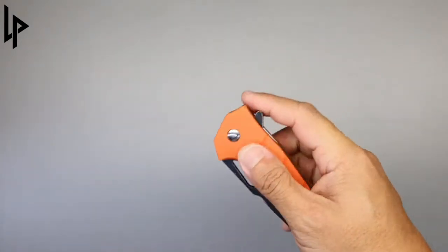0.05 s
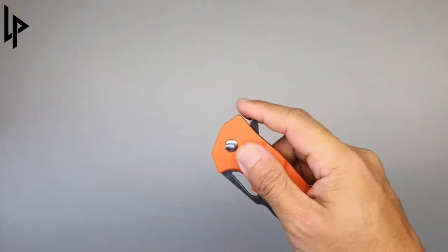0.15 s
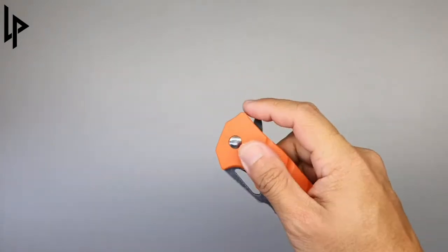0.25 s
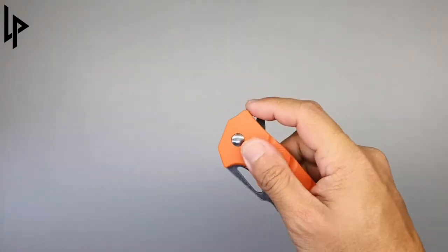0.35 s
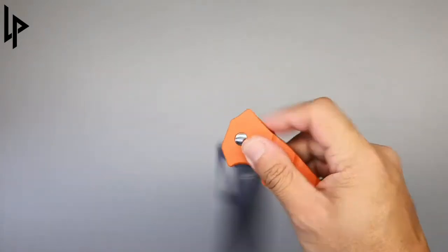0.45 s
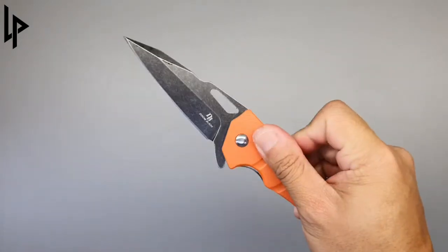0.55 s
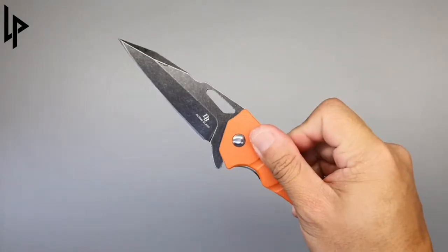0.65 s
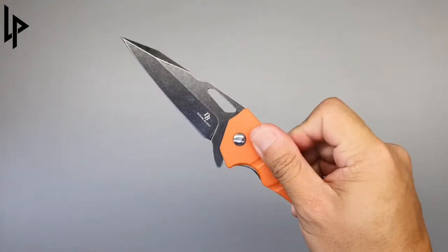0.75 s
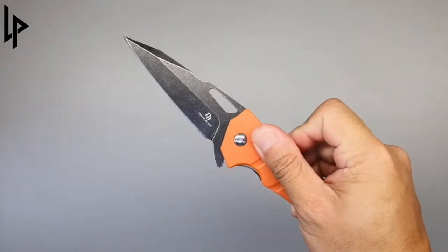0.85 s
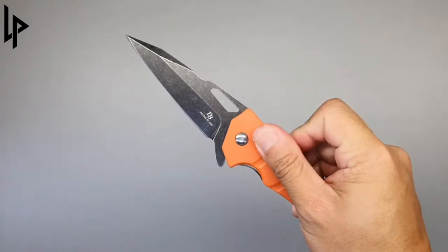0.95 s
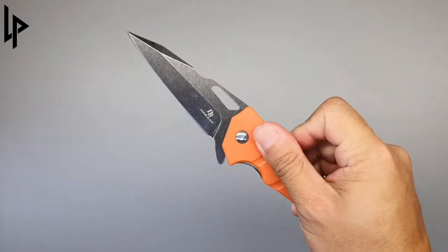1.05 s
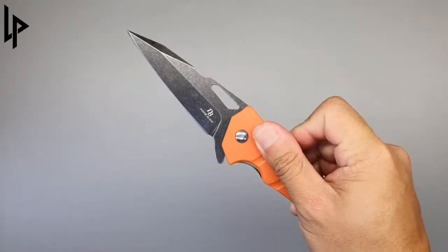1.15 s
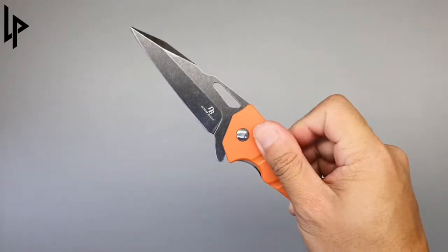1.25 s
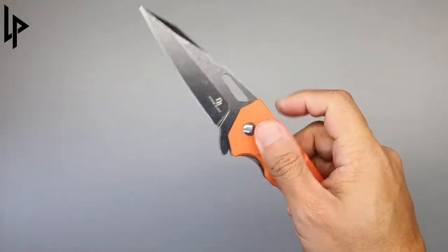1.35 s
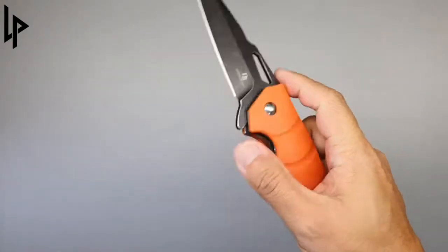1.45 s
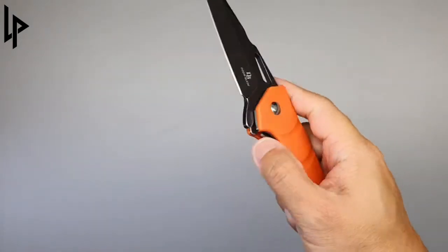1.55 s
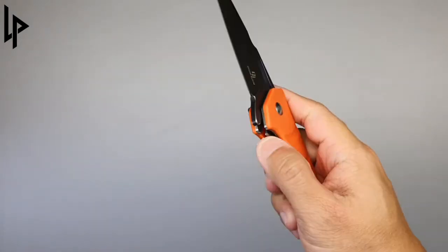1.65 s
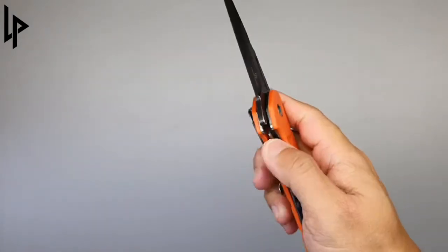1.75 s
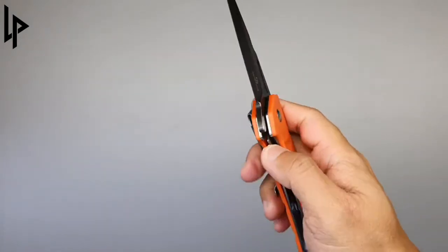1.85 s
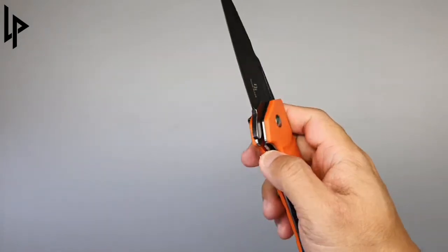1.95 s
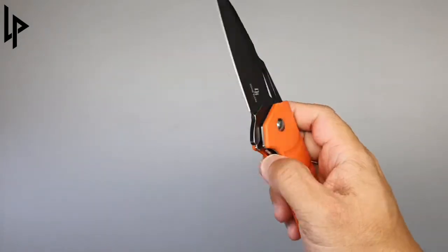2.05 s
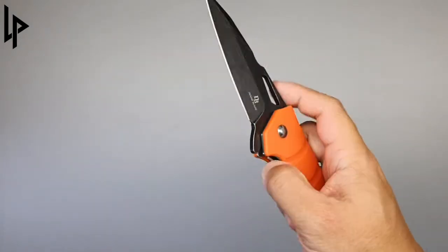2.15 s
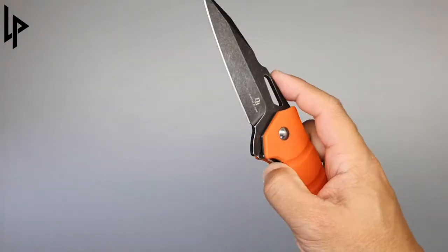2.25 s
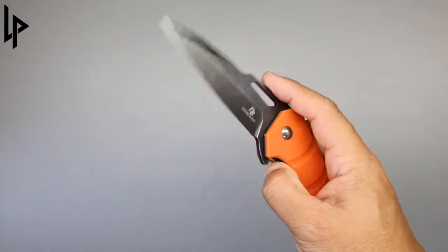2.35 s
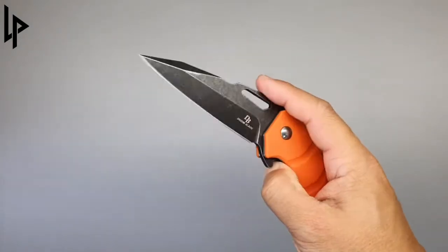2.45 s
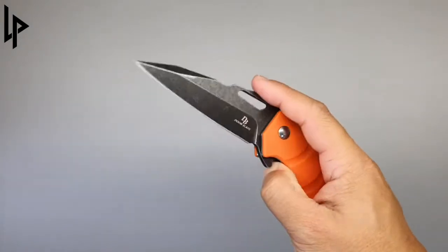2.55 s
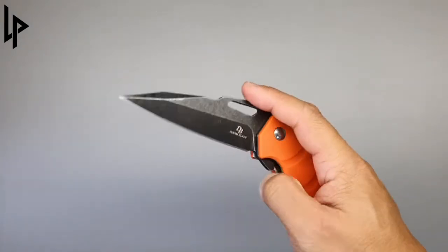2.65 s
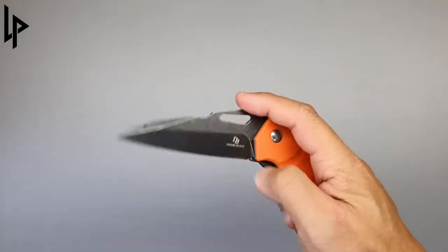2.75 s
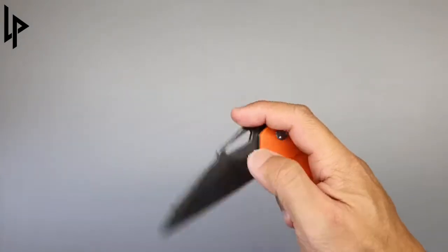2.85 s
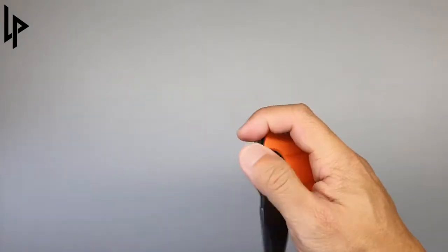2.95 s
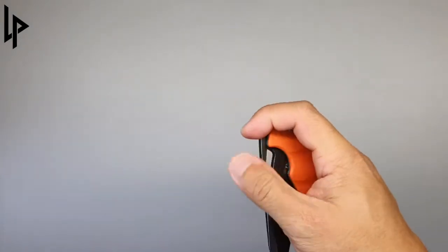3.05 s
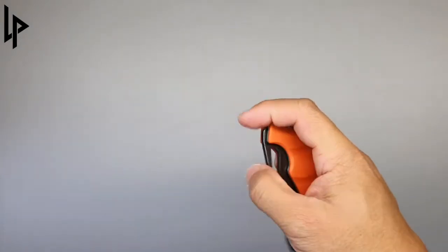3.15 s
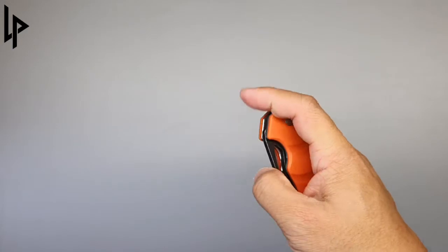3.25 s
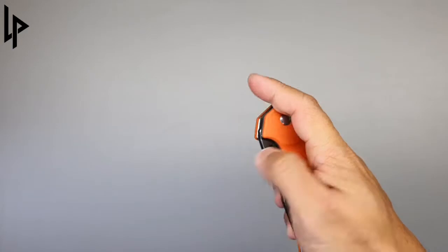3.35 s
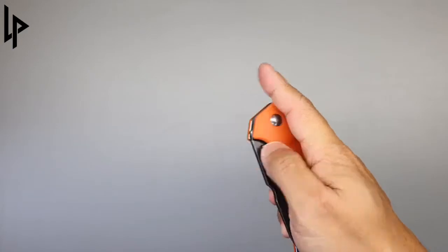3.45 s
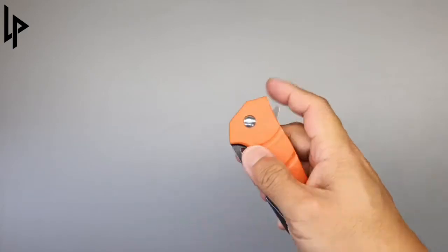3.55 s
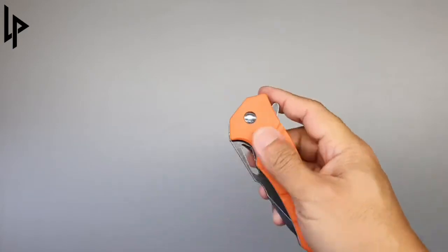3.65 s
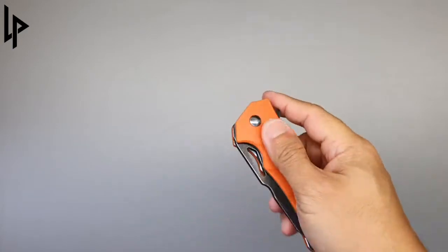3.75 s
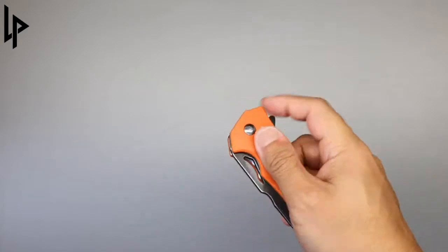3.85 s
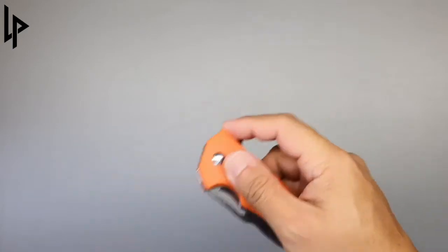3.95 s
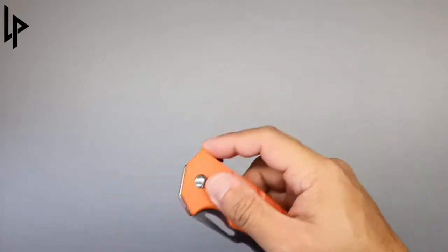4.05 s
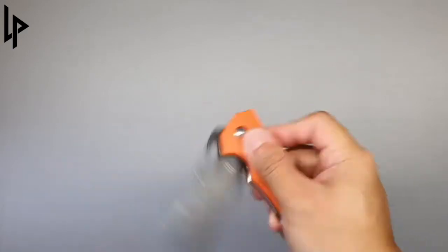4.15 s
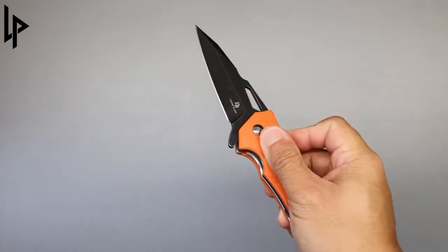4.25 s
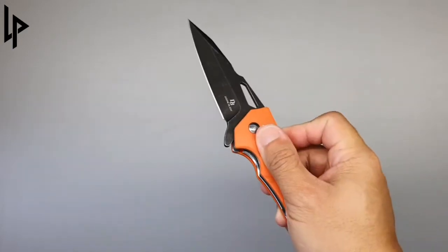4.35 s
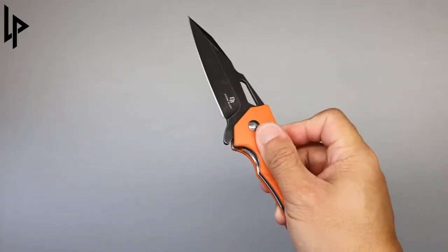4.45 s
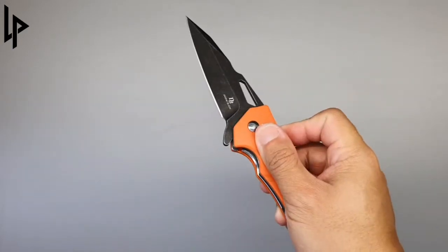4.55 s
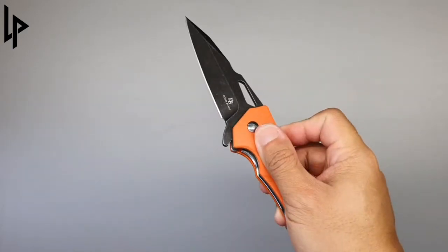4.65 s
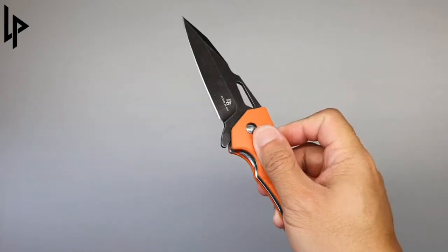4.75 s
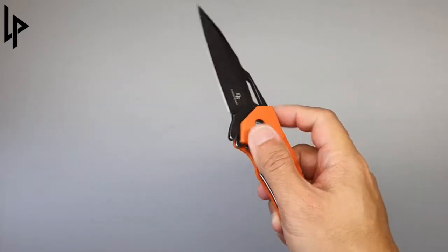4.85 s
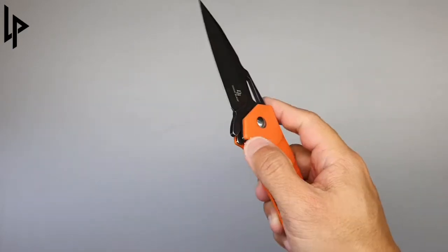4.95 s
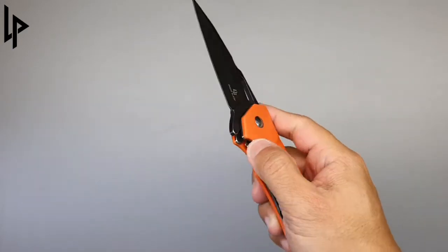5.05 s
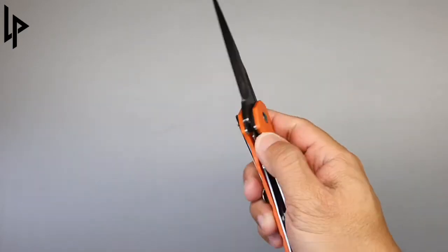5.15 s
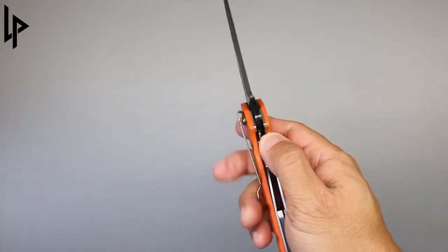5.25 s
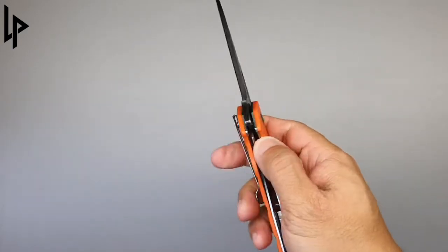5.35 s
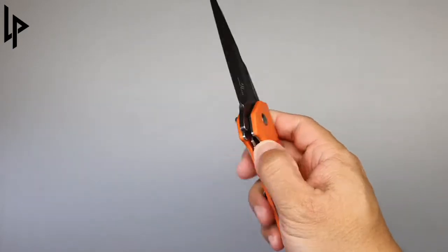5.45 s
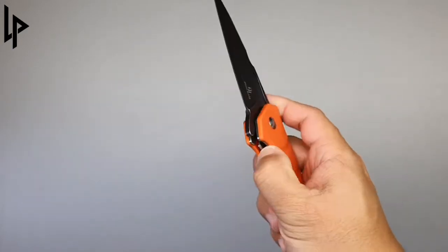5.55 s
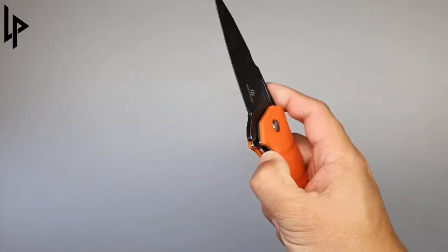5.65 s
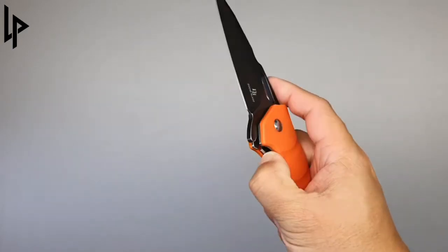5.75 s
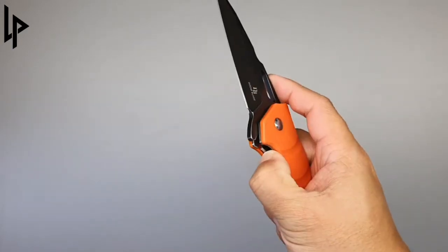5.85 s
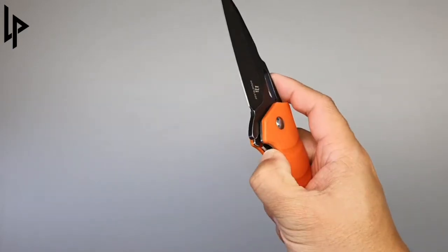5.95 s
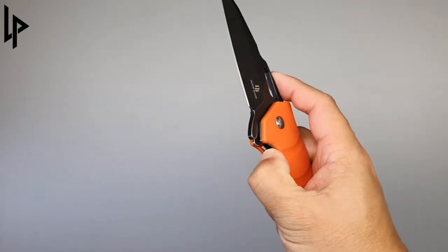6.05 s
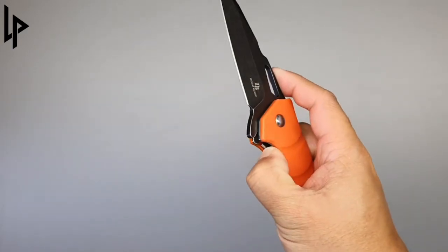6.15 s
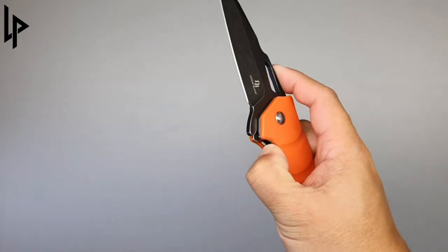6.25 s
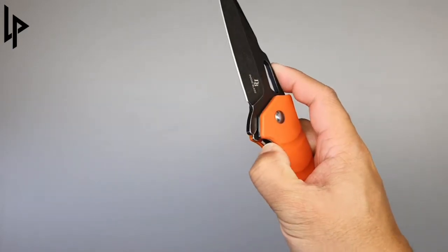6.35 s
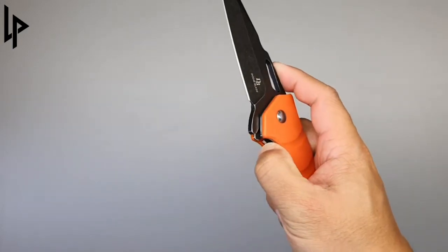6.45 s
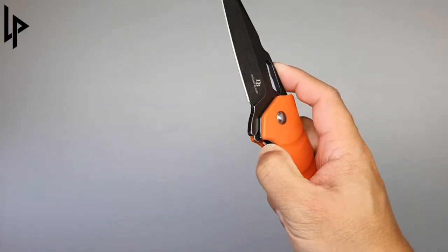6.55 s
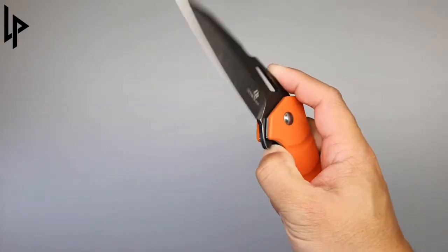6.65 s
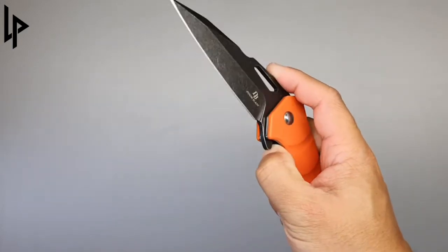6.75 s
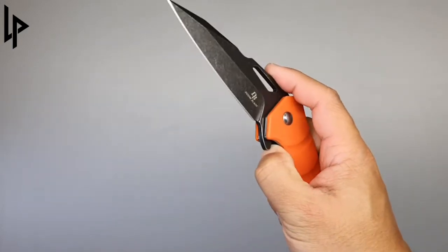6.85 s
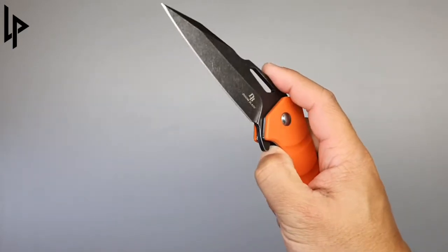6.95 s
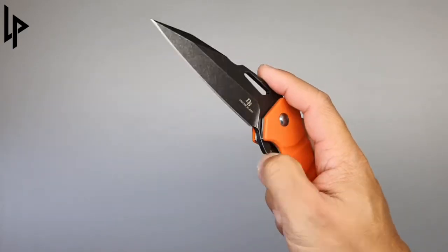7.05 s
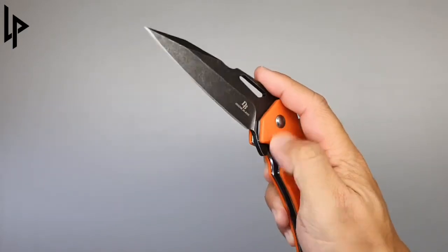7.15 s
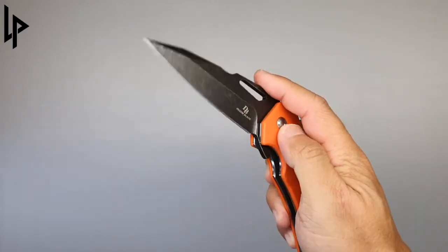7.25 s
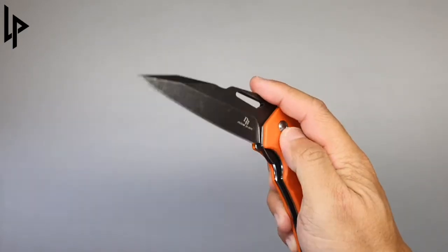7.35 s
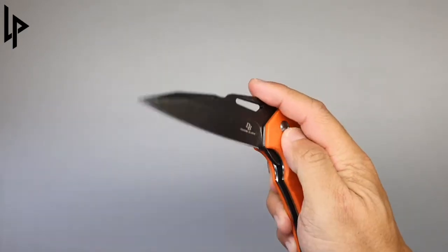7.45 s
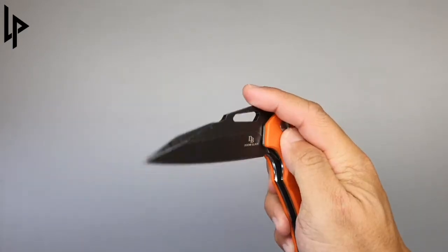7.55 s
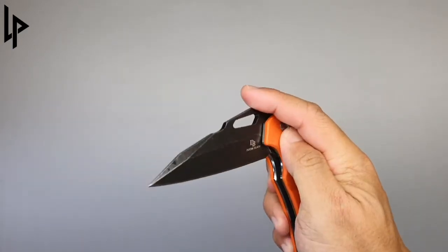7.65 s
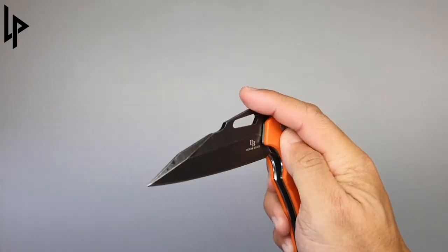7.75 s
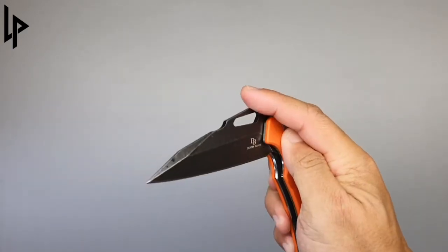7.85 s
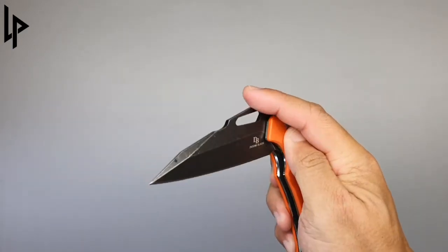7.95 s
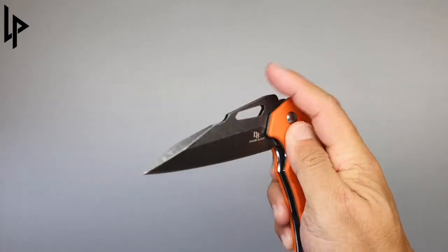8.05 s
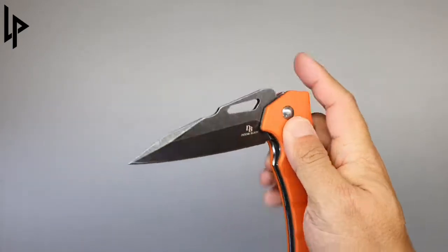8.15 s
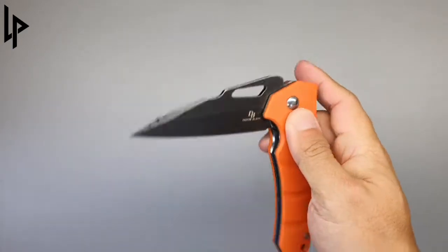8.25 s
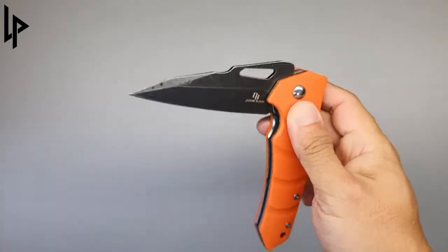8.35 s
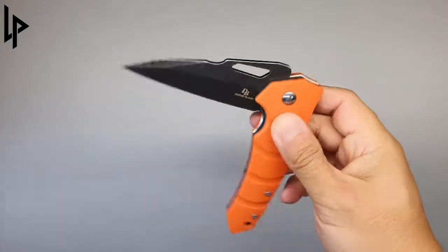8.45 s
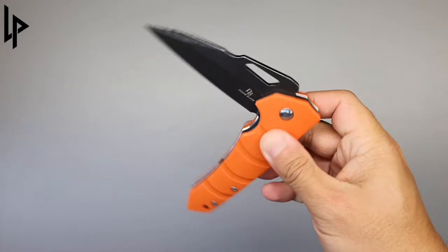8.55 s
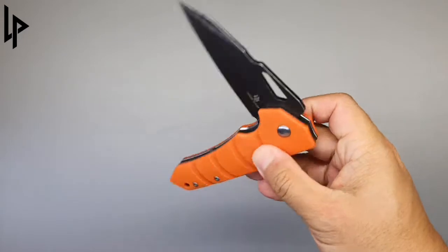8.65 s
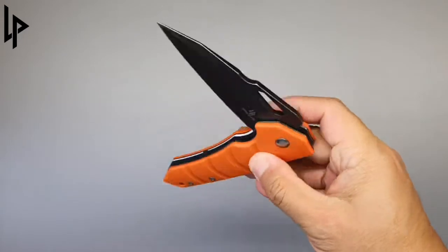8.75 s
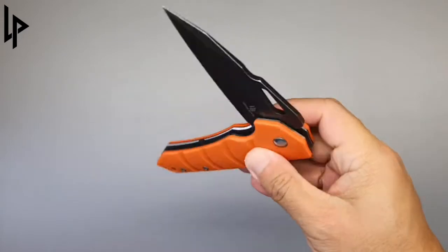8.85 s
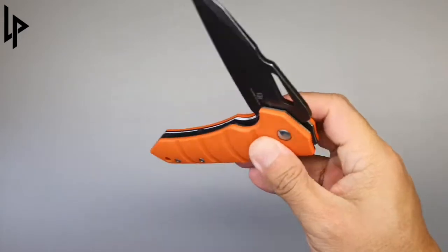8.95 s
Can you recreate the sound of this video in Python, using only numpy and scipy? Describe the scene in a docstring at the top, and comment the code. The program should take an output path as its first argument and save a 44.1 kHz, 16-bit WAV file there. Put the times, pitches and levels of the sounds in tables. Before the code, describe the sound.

A quiet small room with faint low ventilation rumble, barely audible hums and soft hiss, heard in stereo from very close. Light skin rubbing opens it. At about 0.42-0.5 s a folding knife flicks open: a quick grinding rattle of ticks builds into a loud, bright steel clack with a very short ring and room tail. Faint finger rubs follow from 1.3 s. Around 2.15-2.23 s the thumb gives tiny wavering squeaks, and at 2.3 s the lock releases with a crisp click. A barely audible tick at 2.8 s precedes a moderate closing knock at 3.16 s. Airy handle rubs come near 3.6 s, then small ticks and a second loud double snap at 4.14 s. Subtle rubbing and a faint squeak at 5.65 s lead to a softer cluster of unlocking clicks at 6.6 s. After that only slight skin rubs remain over room tone until 9 s.

```python
"""A folding knife is flicked open and folded shut in one hand, close to a phone in a small quiet room.
Its steel parts knock: bursts of tiny contacts ring fading tones of blade, lock bar and handle.
Grinding steel murmurs in the swings, the thumb squeaks as wavering tones, and skin rubs the textured
handle as uneven noise through resonances. The room adds a short noise tail to these near sounds,
over a faint ventilation rumble, hums and hiss."""
import sys
import numpy as np
from scipy import signal
from scipy.fft import rfft, irfft, next_fast_len
from scipy.io import wavfile
from scipy.ndimage import uniform_filter1d, map_coordinates

SR = 44100
rng = np.random.default_rng(int(sys.argv[2]) if len(sys.argv) > 2 else 0)


def to_wav(s):
    """Save 16-bit WAV."""
    ch = np.atleast_2d(s).T  # columns
    pcm = np.round(np.clip(ch, -1, 1) * 32767)  # PCM
    wavfile.write(sys.argv[1], SR, pcm.astype(np.int16))


N = 397341  # length in samples


def undb(db):
    """Turn decibels into a plain gain."""
    return 10 ** (np.asarray(db) / 20)


def unit(x):
    """Scale to rms 1."""
    return x / np.sqrt(np.mean(x ** 2))


def on_log(hz, table):
    """Read a (pitch_hz, value) table on a log-frequency axis."""
    table_hz, values = np.transpose(table)[:2]
    return np.interp(np.log(np.maximum(hz, 1)), np.log(table_hz), values)


def band(x, hz, width_hz):
    """Two-pole resonance, gain 1 at the centre."""
    return signal.lfilter(*signal.iirpeak(hz, hz / width_hz, fs=SR), x)


def walk(rate_hz):
    """A smooth random wander of rms 1: steps at this rate, averaged twice."""
    step = int(SR / rate_hz)
    levels = np.repeat(rng.standard_normal(N // step + 1), step)
    smooth = uniform_filter1d(uniform_filter1d(levels, step), step)
    return unit(smooth[:N])


def gesture(start_s, length_s, attack_s, release_s):
    """Swells up to the start, holds, then dies away; both flanks are bell-shaped."""
    t = np.arange(N) / SR - start_s
    before = np.minimum(t, 0) / attack_s
    after = np.maximum(t - length_s, 0) / release_s
    return np.exp(-4 * (before ** 2 + after ** 2))


# Tone colour of the room's background noise: pitch_hz, relative level_db (per Hz)
AIR_COLOUR = [(12, -40.5), (20, -19.5), (48, -1.5), (107, -5), (138, -7.5), (234, -18), (262, -21.5),
              (328, -12.5), (485, -22), (738, -21), (923, -26), (1860, -39.5), (2080, -42), (7730, -51),
              (16000, -58.5)]
# How much the two microphone ports differ in that noise: pitch_hz, side_minus_mid_db
AIR_WIDTH = [(60, -11), (110, -15.5), (200, -8.5), (380, -3), (700, -1.5), (1290, 2.5), (2380, 1),
             (4400, -2), (8120, 1), (15000, -1.5)]
# Slow rise and fall of the rumble: time_s, level_db
RUMBLE_LEVELS = [(0.0, -62), (0.93, -68.5), (3.26, -65), (4.47, -70), (5.8, -62.5), (6.52, -67),
                 (9.01, -63.5)]
# Faint hums, each wandering around these values: pitch_hz, level_db
HUMS = [(59.2, -73.5), (145.3, -73.5), (1100, -95), (1803, -99)]
HISS_DB = -71.5  # the level drifts around this


def air():
    """Room tone: a wandering rumble, nearly alike on both ports, four hums and a nearly steady hiss."""
    t = np.arange(N) / SR
    size = next_fast_len(N)
    hz = np.arange(size // 2 + 1) * SR / size
    mid, side = rfft(rng.standard_normal((2, size))) * undb(on_log(hz, AIR_COLOUR))
    side = side * undb(on_log(hz, AIR_WIDTH))
    pair = np.array([mid + side, mid - side])
    # split around 200 Hz into rumble and hiss
    low = 1 / (1 + (hz / 200) ** 4)
    rumble = unit(irfft(pair * np.sqrt(low), size)[:, :N])
    rumble = rumble * undb(np.interp(t, *np.transpose(RUMBLE_LEVELS)))
    hiss = unit(irfft(pair * np.sqrt(1 - low), size)[:, :N]) * undb(HISS_DB + .7 * walk(1.0))
    hum = np.zeros(N)
    for pitch_hz, level_db in HUMS:
        loudness = np.sqrt(2) * undb(level_db + 3.0 * walk(6.3))
        wandering_hz = pitch_hz + 0.72 * walk(3.2)
        hum += loudness * np.sin(2 * np.pi * np.cumsum(wandering_hz) / SR)
    return rumble + hiss + hum


# Room tail by pitch region: pitch_hz, t60_s (time to fall 60 dB), tail_energy_db
ROOM_BANDS = [(504, .15, -23.5), (1400, 0.085, -20), (2679, 0.22, -15), (5830, 0.28, -16), (11000, .2, -10)]


def room(dry):
    """A diffuse noise tail, different at each microphone port, with its own fading time in each band."""
    t = np.arange(SR // 2) / SR
    tail = 0
    for hz, t60_s, energy_db in ROOM_BANDS:
        edges_hz = [hz / 1.5, min(hz * 1.3, .45 * SR)]
        sos = signal.butter(2, edges_hz, "band", fs=SR, output="sos")
        onset = np.clip((t - .003) / 0.002, 0, 1)  # silent for the first 3 ms
        decay = np.exp(-np.log(1000) * t / t60_s) * onset
        noise = unit(signal.sosfilt(sos, rng.standard_normal((2, len(t))))) * decay
        tail = tail + undb(energy_db) * noise / np.sqrt(np.sum(decay ** 2))
    return signal.fftconvolve(dry.mean(axis=0)[None], tail, axes=1)[:, :N]


# Strokes of skin over the handle: start_s, length_s, level_db,
# airy_top_db (relative to the stroke), favoured_resonance_hz
STROKES = [(-.03, 0.169, -78, -0.5, 6100), (1.296, 0.035, -84.5, 4, 7800), (1.34, .1, -83, -20, 7800),
           (1.461, 0.057, -72.5, -26, 4940), (1.696, 0.091, -90.5, -8, 6100),
           (1.8, 0.098, -82.5, -12, 6100), (2.047, 0.07, -79.5, -12, 7800), (2.12, 0.06, -76, -22, 5080),
           (2.208, 0.023, -74, -25, 6100), (2.561, 0.055, -83, -12, 5080), (2.645, .025, -77, -11, 5080),
           (2.782, 0.14, -80, -0.5, 6100), (3.41, 0.13, -78.5, -29, 7800), (3.578, 0.068, -69, 1, 7800),
           (3.664, 0.058, -74.5, -2, 6100), (3.737, 0.049, -73, 0.5, 6100), (4.761, .06, -86, -9, 7800),
           (4.871, 0.064, -81.5, -20, 6100), (4.983, 0.034, -82.5, -18, 6100),
           (5.121, 0.15, -81.5, -14, 6100), (5.39, 0.052, -80.5, -18, 6100),
           (5.45, 0.097, -74.5, -25, 5080), (5.555, 0.053, -76.5, -14, 5080),
           (5.635, 0.026, -85, -23, 7800), (6.329, 0.041, -73.5, -12, 5080), (6.969, 0.069, -82, -20, 5080),
           (7.055, 0.023, -69.5, -10, 5080), (7.2, 0.068, -92, -10, 7800), (7.39, .035, -83.5, -15, 7800),
           (8.014, 0.064, -84, -20, 7800), (8.109, .03, -86, -16, 7800), (8.393, .1, -80, -4, 7800),
           (8.506, 0.075, -78.5, -22, 7800), (8.619, 0.04, -82, -25, 7800), (8.808, .12, -88, -14, 7800)]
# Broad resonances of the rubbed handle: pitch_hz, width_hz, relative level_db (wanders)
RUB_RESONANCES = [(2920, 1350, -13.5), (4800, 72, -7), (5140, 250, -1), (6040, 260, -1.5), (7440, 360, 1)]
# part of each stroke held in the middle; each flank is a share of the length plus a minimum
HOLD_SHARE, FLANK_SHARE, FLANK_MIN_S = .4, .55, .008
STROKE_FAVOURED_DB = 5.5  # favoured resonance over the others


def rubbing():
    """Dense uneven micro-slips ring the broad resonances of the handle; a hiss lies above them."""
    slips = rng.standard_normal((2, N)) * undb(2.6 * np.minimum(rng.exponential(size=N), 6.0))
    modes = np.array([undb(db + 3 * walk(9)) * band(slips, hz, width_hz)
                      for hz, width_hz, db in RUB_RESONANCES])
    modes = modes / np.sqrt(np.mean(modes.sum(axis=0) ** 2))
    top = unit(signal.sosfilt(signal.butter(4, 8500, "high", fs=SR, output="sos"), slips))

    start_s, length_s, level_db = np.transpose(STROKES)[:3, :, None]
    flank_s = FLANK_SHARE * length_s + FLANK_MIN_S
    hold_start_s = start_s + length_s * (1 - HOLD_SHARE) / 2
    strokes = undb(level_db) * gesture(hold_start_s, length_s * HOLD_SHARE, flank_s, flank_s)

    top_db, favoured_hz = np.transpose(STROKES)[3:]
    # each stroke presses elsewhere and brings out one resonance
    mode_hz = np.array(RUB_RESONANCES)[:, :1]
    near = np.exp(-(np.log(mode_hz / favoured_hz) / .06) ** 2)
    mode_levels = undb(STROKE_FAVOURED_DB * (near - .5)) @ strokes
    body = np.sum(mode_levels[:, None] * modes, axis=0)
    airy_top = (undb(top_db) @ strokes) * top
    return (body + airy_top) * undb(2.1 * walk(40) + 1.9 * walk(120))


# Thumb squeaks: start_s, length_s, start_pitch_hz, end_pitch_hz (the pitch wavers around
# these), level_db (flutters), overtones_db (relative to the main tone)
SQUEAKS_PLAYED = [(2.15, 0.016, 2020, 1938, -63.5, -16), (2.197, 0.011, 2140, 2360, -58, -23),
                  (2.212, 0.015, 2067, 2126, -56, -2.5), (2.23, 0.024, 2115, 2140, -76, -17),
                  (5.646, 0.034, 2168, 2125, -70.5, -13.5), (6.331, 0.016, 4180, 4160, -70, -21),
                  (6.39, 0.045, 5120, 5234, -93, -30), (6.477, 0.063, 5150, 5220, -90, -33)]
SQUEAK_ATTACK_S, SQUEAK_RELEASE_S = 0.0075, 0.008
THIRD_DB = -6  # third partial under the second


def squeaks():
    """Stick-slip of the thumb on the lock bar: a wavering tone with two overtones."""
    t = np.arange(N) / SR
    out = np.zeros(N)
    waver, flutter = 1 + .012 * walk(300), undb(2.5 * walk(150))
    for start_s, length_s, start_hz, end_hz, level_db, overtones_db in SQUEAKS_PLAYED:
        pitch_hz = np.interp(t, [start_s, start_s + length_s], [start_hz, end_hz]) * waver
        phase = 2 * np.pi * np.cumsum(pitch_hz) / SR
        overtones = np.sin(2 * phase) + undb(THIRD_DB) * np.sin(3 * phase)
        tone = np.sin(phase) + undb(overtones_db) * overtones
        shape = gesture(start_s, length_s, SQUEAK_ATTACK_S, SQUEAK_RELEASE_S)
        out += np.sqrt(2) * tone * undb(level_db) * shape
    return out * flutter


# fading times (60 dB) of ordinary modes; a favoured mode rings longer
BLADE_T60_S, LOCK_BAR_T60_S, HANDLE_T60_S = .010, .014, .035
FAVOURED_DB = 3  # boost of the favoured mode


def ring(modes, t60_s, chance, low_db=0, high_db=0, favoured_hz=1):
    """Decaying modes of alternate sign; each blow lands elsewhere, so sizes and pitches scatter."""
    hz, db = np.transpose(modes)[:, :, None]
    t = np.arange(SR // 20) / SR
    db = db + low_db * (hz < 3000) + high_db * (hz > 7000)
    db = db + 1.5 * chance[0, :len(modes), None]
    # the mode that the grip leaves free is louder and rings longer
    free = np.exp(-(np.log(hz / favoured_hz) / .04) ** 2)
    db = db + FAVOURED_DB * free
    t60_s = t60_s * (1 + 1.5 * free)
    hz = hz * (1 + .01 * chance[1, :len(modes), None])
    sign = (-1) ** np.arange(len(modes))[:, None]
    decay = np.exp(-np.log(1000) * t / t60_s)
    return np.sum(sign * undb(db) * decay * np.sin(2 * np.pi * hz * t), axis=0)


# Swings of grinding steel: start_s, length_s, swell_before_start_s, level_db,
# lock_bar_ring_db (relative to the blade)
SWINGS_PLAYED = [(0.434, 0.052, 0.045, -54.5, -6), (2.299, 0.0063, 0.016, -52.5, 9),
                 (4.096, .04, .05, -55, -2.5), (6.589, 0.02, 0.031, -52, -5)]
# Ringing tones (modes) of the blade, also used by the knocks: pitch_hz, relative level_db
BLADE_MODES = [(1330, -10.5), (1550, -8), (1910, -8.5), (2300, -10.5), (2640, -9.5), (3000, -8.5),
               (3350, -8), (3800, -5), (4350, 0), (4700, -2), (5250, -5.5), (5750, -3), (6110, -4),
               (6580, -6), (7000, -8.5), (7410, -6.5), (8100, -4), (9080, -7), (9800, -11), (10500, -9),
               (11250, -10), (12300, -9.5), (13250, -9.5), (14300, -15.5), (15200, -13)]
# Ringing tones of the lock bar, also used by the knocks: pitch_hz, relative level_db
LOCK_BAR_MODES = [(2730, -6.5), (4200, -5.5), (5200, 2.5), (7900, -8.5)]
SWING_RELEASE_S = 0.011


def swinging():
    """Grinding steel keeps the modes of blade and lock bar murmuring."""
    grit = rng.standard_normal(N) * undb(3 * np.minimum(rng.exponential(size=N), 6))
    still = np.zeros((2, len(BLADE_MODES)))  # no scatter
    thin = signal.butter(6, 1100, "high", fs=SR, output="sos")
    blade_ring = ring(BLADE_MODES, BLADE_T60_S, still, low_db=1.0, high_db=-4.5)
    bar_ring = ring(LOCK_BAR_MODES, LOCK_BAR_T60_S, still)
    blade = unit(signal.sosfilt(thin, signal.fftconvolve(grit, blade_ring)[:N]))
    bar = unit(signal.sosfilt(thin, signal.fftconvolve(grit, bar_ring)[:N]))
    out = np.zeros(N)
    for start_s, length_s, swell_s, level_db, bar_db in SWINGS_PLAYED:
        shape = gesture(start_s, length_s, swell_s, SWING_RELEASE_S)
        out += undb(level_db) * shape * (blade + undb(bar_db) * bar)
    return out


def rattle(rattle_ms, bounce_db):
    """A burst of tiny contacts that excites all pitches evenly, with a weaker, slower tail of bounces."""
    t = np.arange(SR // 25) / SR * 1000 / rattle_ms  # in rattle lengths
    push = (np.exp(-t ** 2) + undb(bounce_db) * np.exp(-t / 2)) * (1 - np.exp(-t / 0.15))
    contacts = rng.standard_normal(len(t)) * push
    # alternately flatten the spectrum and restore the loudness curve
    for _ in range(6):
        spectrum = rfft(contacts)
        contacts = irfft(spectrum / np.abs(spectrum), len(t))
        contacts = contacts * push / np.sqrt(uniform_filter1d(contacts ** 2, size=24) + 1e-12)
    return contacts, push


# Knocks of steel on steel: start_s, steel_peak_db, left_minus_right_db (both before the port balance),
# rattle_ms (time scale), low_modes_db (under 3 kHz), high_modes_db (over 7 kHz),
# favoured_mode_hz, lock_bar_ring_db (relative to the blade)
KNOCKS_PLAYED = [(0.4188, -47.5, 2, 3.8, -5.5, -8.5, 5240, -13), (0.437, -35, -1.5, 8.8, 5, -7, 4400, -9.5),
                 (0.45, -28.5, 1.5, 5.7, -5.5, -7, 5950, -10.5), (0.4867, -19, .1, 14, -3, -6, 4546, -8),
                 (0.5, -2, -1.5, 3.08, -2, -2, 5960, -19), (2.150, -59, .1, 5.0, -8, -10, 5230, 4),
                 (2.174, -55, -1, 3.4, -9, -7, 5250, 13), (2.303, -22.5, 3, 2.5, -12, -6, 5200, 4),
                 (2.3163, -32.5, 7, 3.8, 8.5, -0.5, 2640, -23), (2.815, -47, 4, 5.3, 11, -22, 1940, -38),
                 (3.112, -53, 1, 15, 12, -2, 4400, 10), (3.1629, -18, 1, 4.1, 2.5, -3.5, 3410, -32),
                 (4.0773, -50, 10, 3.5, 6, -8, 4350, -7.5), (4.0982, -37, 1.5, 2.6, -6.5, -6, 5200, -2.5),
                 (4.11, -22.5, 2.5, 2.6, -3, -7, 5250, 5), (4.123, -38, 1.5, 2.6, -6.5, -8, 5750, -5),
                 (4.1409, -10.5, 0.5, 3.3, -2.5, 4.5, 5250, -1), (4.1468, -1.5, -3, 3.5, -4, 1, 2646, -11),
                 (5.562, -60, .1, 9, -18, -16, 5250, 4), (6.378, -59.5, 5, 1.8, -8, -6, 5250, 8),
                 (6.5943, -25.5, -2, 2.4, 1.5, 14, 4370, 26), (6.606, -27.5, 8, 2.9, -5.5, -3.5, 1550, -1),
                 (6.6378, -34, 1, 1.95, 1, -11, 3800, -19), (6.646, -40, 13, 5.2, -2, -19, 5250, 5)]
# Ringing tones of the handle: pitch_hz, relative level_db
HANDLE_MODES = [(420, -4), (620, 3)]
THUD_DB = -36  # handle thud under the steel


def knocks():
    """Each knock is a short rattle of contacts that rings blade, lock bar and handle."""
    out = np.zeros((2, N))
    # parts this small radiate almost nothing below their lowest mode
    thin_steel = signal.butter(6, 1080, "high", fs=SR, output="sos")
    thin_handle = signal.butter(3, [340, 750], "band", fs=SR, output="sos")
    for start_s, peak_db, pan_db, rattle_ms, low_db, high_db, favoured_hz, bar_db in KNOCKS_PLAYED:
        chance = rng.standard_normal((2, 32))
        contacts, push = rattle(rattle_ms, bounce_db=-7.0)
        steel = ring(BLADE_MODES, BLADE_T60_S, chance, low_db, high_db, favoured_hz)
        steel += undb(bar_db) * ring(LOCK_BAR_MODES, LOCK_BAR_T60_S, chance[::-1], low_db)
        steel = signal.sosfilt(thin_steel, signal.fftconvolve(contacts, steel))
        # the handle feels only the first jolt
        jolt = np.exp(-np.arange(len(push)) / SR / 0.00013)
        handle = ring(HANDLE_MODES, HANDLE_T60_S, chance)
        thud = signal.sosfilt(thin_handle, signal.fftconvolve(jolt, handle))
        knock = steel / np.max(np.abs(steel)) + undb(THUD_DB) * thud / np.max(np.abs(thud))
        first = int(start_s * SR)
        left_right_db = peak_db + np.array([[pan_db], [-pan_db]]) / 2
        out[:, first:first + len(knock)] += knock * undb(left_right_db)
    return out


# How the phone body shades the near sounds: pitch_hz, left_minus_right_db
NEAR_BALANCE = [(400, -6.5), (1300, -3), (4400, -.5), (8100, 4.5), (15000, 0)]
PORT_LAG_MS = .024  # right port after left


def scene():
    """The hand is nearer the left port, which hears it earlier; the phone body shades the ports unevenly."""
    near = knocks() + squeaks() + rubbing() + swinging()
    tail = room(near)
    late = np.arange(N) - PORT_LAG_MS * SR / 1000
    near[1] = map_coordinates(near[1], [late], order=3)
    size = next_fast_len(N)
    hz = np.arange(size // 2 + 1) * SR / size
    lean_db = on_log(hz, NEAR_BALANCE) / 2
    shaded = irfft(rfft(near, size) * undb([lean_db, -lean_db]), size)[:, :N]
    return shaded + tail + air()


def record(dry):
    """The phone cuts the top above 15.9 kHz with a steep low-pass filter."""
    return signal.sosfilt(signal.ellip(10, .2, 60, 15900, fs=SR, output="sos"), dry)


dry = scene()
out = record(dry)
to_wav(out)
```